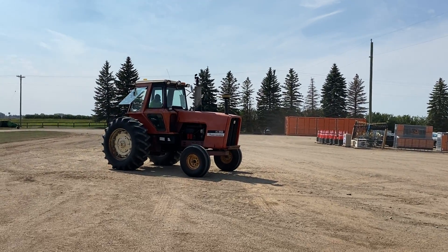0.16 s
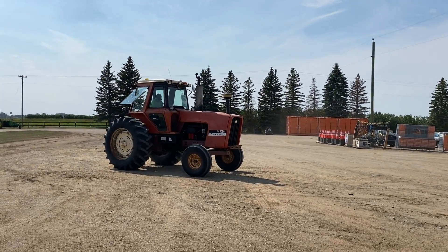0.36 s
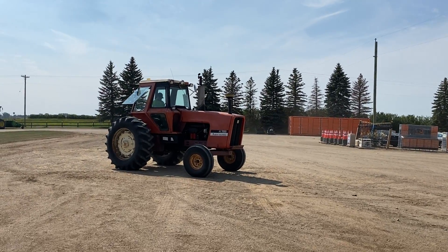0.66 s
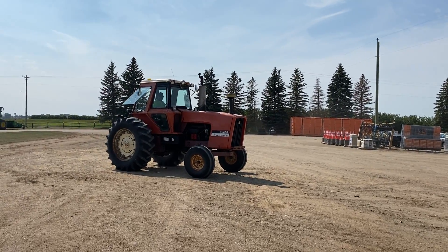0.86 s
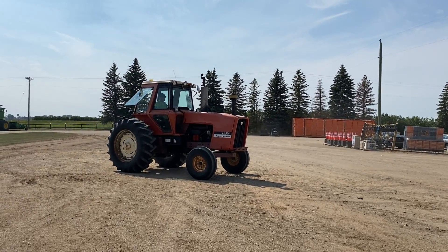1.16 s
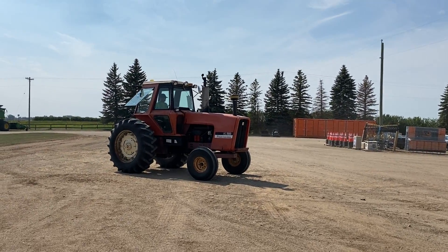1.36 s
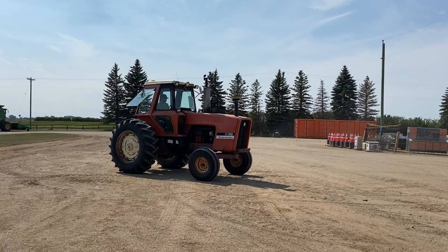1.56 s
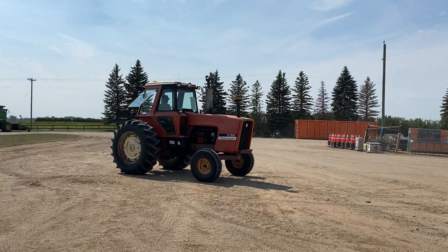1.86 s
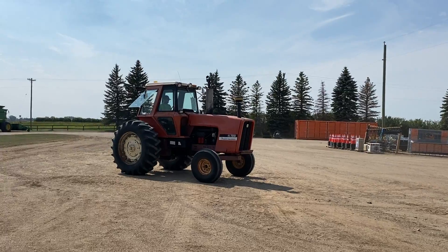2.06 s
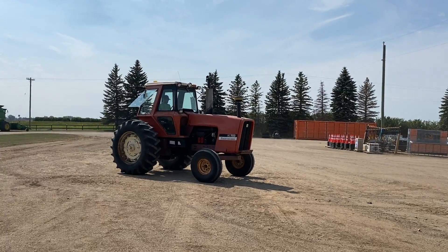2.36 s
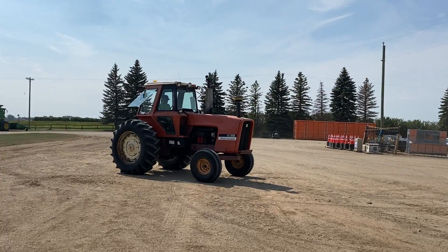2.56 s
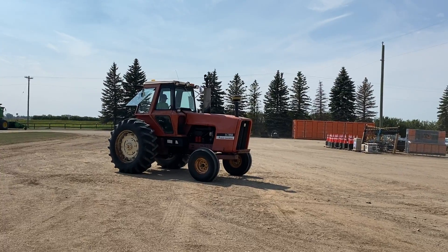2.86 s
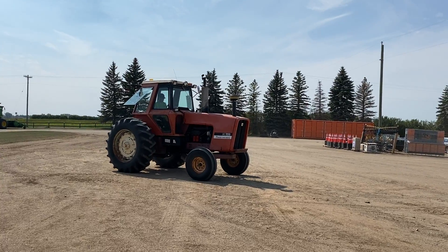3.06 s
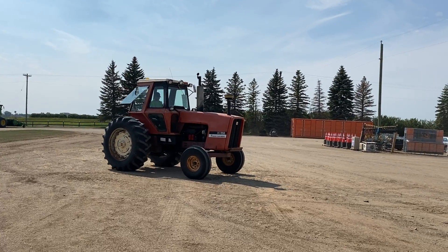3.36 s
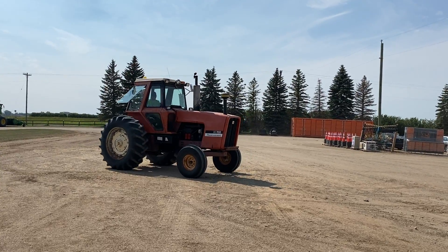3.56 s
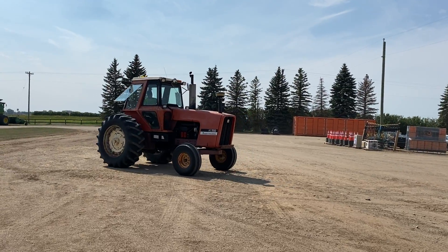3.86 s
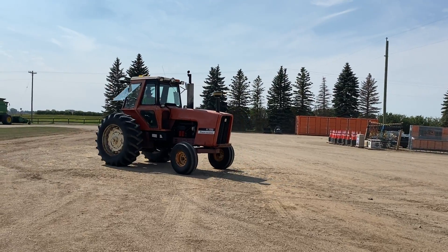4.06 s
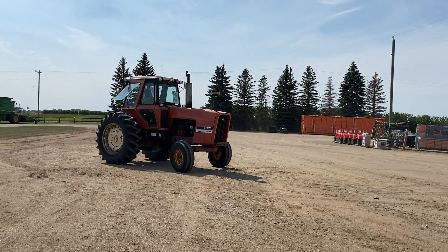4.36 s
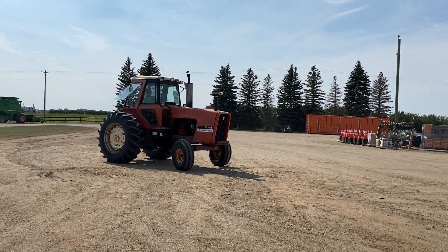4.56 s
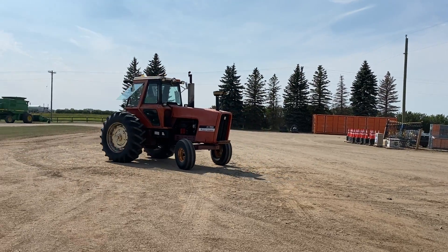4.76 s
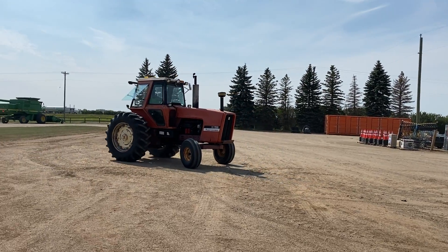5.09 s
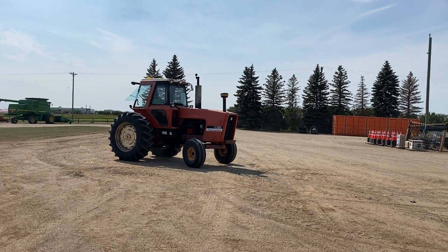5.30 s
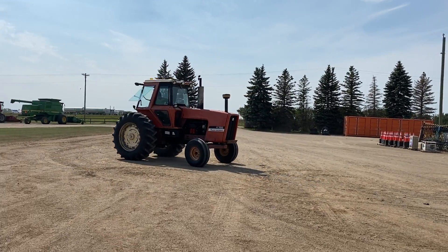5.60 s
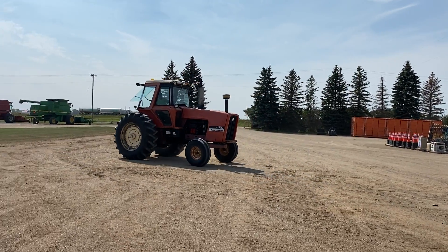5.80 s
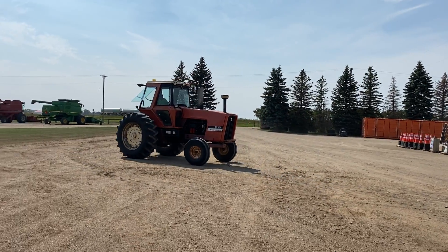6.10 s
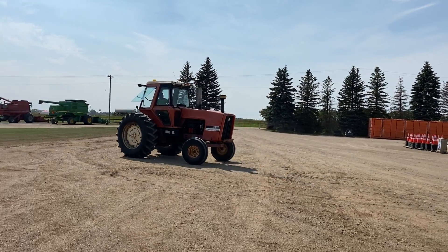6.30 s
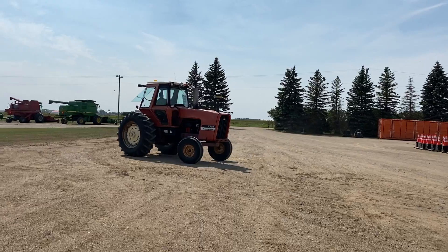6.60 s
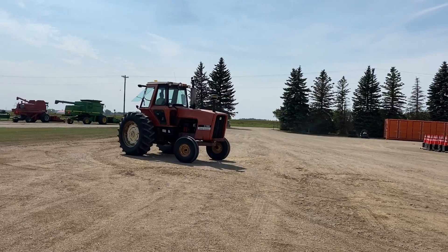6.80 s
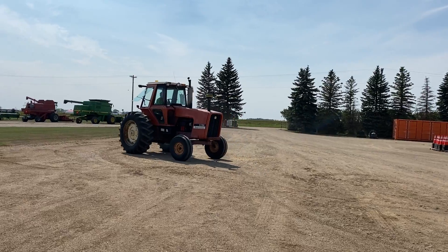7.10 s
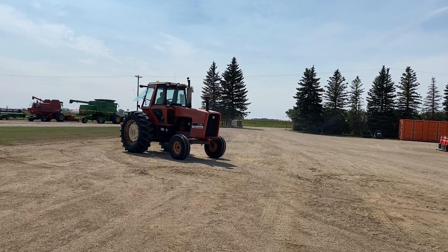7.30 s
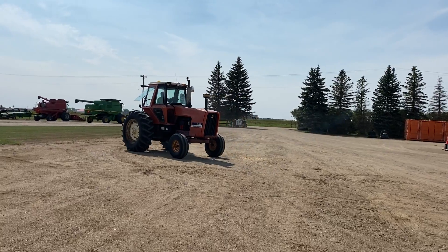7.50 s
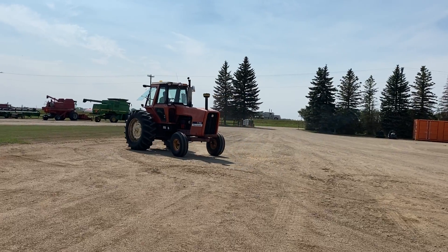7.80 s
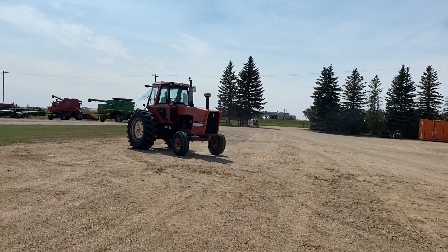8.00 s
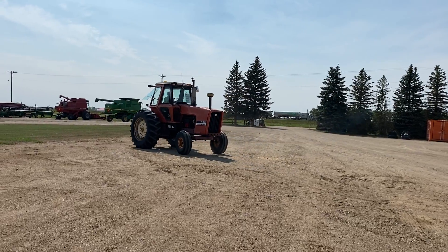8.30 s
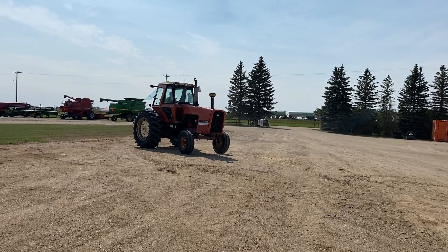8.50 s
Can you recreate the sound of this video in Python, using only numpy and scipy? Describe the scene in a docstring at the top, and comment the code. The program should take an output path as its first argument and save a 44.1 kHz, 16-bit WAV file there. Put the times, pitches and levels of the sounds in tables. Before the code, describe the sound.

Outdoors in an open gravel yard, a large diesel tractor runs steadily at medium-fast speed, with dense knocking, metallic clatter, airy turbo hiss and a strong low drone. Engine speed sags slightly near three seconds. Wind rumbles and thuds on a hand-held stereo microphone, peaking just before four seconds; then the low notes suddenly vanish, leaving a thinner, rattling engine with short wind flutters and a few late slaps.

```python
"""A six-cylinder diesel tractor crawls across a gravel yard, near a hand-held phone in gusty wind.
The block repeats its pattern of knocks every two turns: slowly changing noise, struck by each firing.
Firing and fan notes hum below as sine orders of the shaft; turbocharger hiss, a moving noise band, lies above.
Wind buffets two microphone ports as noise gusts and swinging thuds, until a low cut slides up
and takes the low notes away."""
import sys
import numpy as np
from scipy import signal
from scipy.fft import rfft, irfft, next_fast_len
from scipy.io import wavfile
from scipy.ndimage import uniform_filter1d, minimum_filter1d, map_coordinates

SR = 44100
rng = np.random.default_rng(int(sys.argv[2]) if len(sys.argv) > 2 else 0)


def output_pcm(signal):
    """Save a mono or channel-first signal as 16-bit PCM at the path in sys.argv[1].

    Samples are clipped to [-1, 1] before scaling.
    """
    pcm = np.clip(np.atleast_2d(signal).T, -1, 1) * 32767
    wavfile.write(sys.argv[1], SR, np.round(pcm).astype(np.int16))


N = 381465


# Crankshaft speed. Each row: time in seconds, speed in rpm.
SHAFT_SPEED = [(0, 1554), (1.9, 1551), (2.3, 1546), (2.6, 1512), (3.05, 1462), (3.3, 1460), (3.6, 1468),
               (4.3, 1466), (4.6, 1467), (5.15, 1481), (5.8, 1480), (6.2, 1488), (6.7, 1488), (7.05, 1484),
               (7.35, 1536), (7.8, 1539), (8.65, 1535)]


def crankshaft():
    """Phase is the integral of speed: counts the four-stroke cycles, of two turns each."""
    rpm = curves(SHAFT_SPEED)[0]
    return np.cumsum(rpm) / (120 * SR)


def tractor(cycle):
    """Superposition of block knock, top-end clatter, turbocharger hiss and a ringing panel."""
    return block_knock(cycle) + top_end_clatter(cycle) + turbocharger(cycle) + ringing_panel(cycle)


# Engine noise. Each row: time in seconds, block knock in dB, mean top-end clatter in dB.
ENGINE_LEVELS = [(0, -22.5, -36), (.7, -22.5, -33.5), (1.8, -23, -34), (2.4, -21.5, -33),
                 (3.9, -21.5, -33.5), (5.4, -24, -34.5), (6.6, -23.5, -36.5), (7.2, -22, -36),
                 (7.6, -21.5, -38), (8.65, -24, -38)]
# How the tractor faces the phone. Each row: time in seconds, facing from 0 side-on to 1 nose-on,
# changes of the knock pattern per second, unrepeated noise in dB relative to the repeating noise.
FACING_PATH = [(0, 0, .9, -9.5), (2.1, 0, .9, -9.5), (2.5, .3, 2.2, -6), (3.2, 1, 2.2, -6),
               (3.8, 1, 1.1, -9), (5.8, 1, 1.1, -9), (6.6, .7, 1.1, -9), (7, .6, 2.2, -6),
               (8.65, .5, 2.2, -5)]
# Relative spectrum of the block. Each row: frequency in Hz, density in dB per Hz.
BLOCK_SPECTRUM = [(60, 7), (150, -8.5), (400, -7.5), (650, -1), (850, 2), (1050, 0), (1250, 3),
                  (1500, -2.5), (1750, -1.5), (2100, -7), (2400, -9), (2900, -20), (3600, -45)]


def block_knock(cycle):
    """Forced vibration: a cyclic noise pattern, partly random, pulsed by combustion and coloured by the block."""
    knock_db, _ = curves(ENGINE_LEVELS)
    _, change, loose_db = curves(FACING_PATH)
    drive = repeating(cycle, change) + amp(loose_db) * rng.standard_normal(N)
    drive /= np.sqrt(1 + amp(2 * loose_db))  # the mix keeps its power
    blows = drive * firings(cycle, fall_db=5, scatter_db=.8)
    return amp(knock_db) * coloured(blows + cracks(cycle), BLOCK_SPECTRUM)


def repeating(cycle, change):
    """Periodicity gives a line spectrum: all orders alike in strength, melting into new patterns."""
    size = 3400  # samples in one pattern
    age = np.cumsum(change) / SR
    phases = rng.random((int(age[-1]) + 2, size // 2 + 1))
    patterns = unit(irfft(np.exp(2j * np.pi * phases), size))
    row = age.astype(int)
    place = (cycle % 1 * size).astype(int)
    turn = np.pi / 2 * (age - row)  # equal-power crossfade
    return np.cos(turn) * patterns[row, place] + np.sin(turn) * patterns[row + 1, place]


# Uneven cylinders. Each entry: relative strength of one firing in dB.
CYLINDER_STRENGTHS = [0.89, 1.3, 1.3, 0.89, 0.74, 1.23]


def firings(cycle, fall_db, scatter_db):
    """Impulsive excitation: six uneven blows a cycle rise at once and fall exponentially, by fall_db each."""
    place = cycle * len(CYLINDER_STRENGTHS)
    blow = place.astype(int)
    chance = scatter_db * rng.standard_normal(blow[-1] + 1)[blow]
    strength = np.take(CYLINDER_STRENGTHS, blow, mode="wrap")
    return amp(strength + chance - fall_db * (place % 1))


def cracks(cycle):
    """Steep pressure rise: one sharp click of uneven size at each combustion, to be coloured by the block."""
    start = np.diff(np.floor(cycle * len(CYLINDER_STRENGTHS)), prepend=0)
    return -start * amp(15 + 3 * rng.standard_normal(N))  # 15 dB, scatter 3 dB


# Relative spectrum of the top end. Each row: frequency in Hz, density in dB per Hz.
TOP_END_SPECTRUM = [(1500, -1.5), (2500, 9.5), (3500, 3.5), (5200, 4), (6200, -0.5), (7200, -7.5),
                    (9000, -6), (11000, -12.5), (15500, -17)]
RATTLE_DB, RATTLES_PER_S = .6, 8  # the level wanders as the wheels roll over ruts


def top_end_clatter(cycle):
    """Amplitude modulation: patchy noise beats with the firings, between the block's blows."""
    _, clatter_db = curves(ENGINE_LEVELS)
    rattle = patchy(rng.standard_normal(N), depth_db=1)  # loose tinware shakes over the gravel
    blows = rattle * firings(cycle + .25, fall_db=3.8, scatter_db=1.3)
    return amp(clatter_db + RATTLE_DB * wobble(RATTLES_PER_S)) * coloured(blows, TOP_END_SPECTRUM)


# Turbo hiss. Each row: time in seconds, centre in Hz, level in dB.
HISS = [(0, 4390, -48), (.65, 4320, -47), (.72, 4330, -40), (1.3, 4300, -48), (1.37, 4310, -40),
        (1.95, 4280, -47), (2, 4270, -38), (2.07, 4280, -45.5), (2.65, 4380, -38.5), (2.77, 4420, -41.5),
        (4.14, 4600, -41.5), (4.18, 4600, -63), (4.26, 4650, -45), (4.45, 4700, -41), (4.99, 4500, -39.5),
        (5.28, 4480, -32.5), (5.35, 4510, -46), (5.59, 4520, -35), (6.38, 4460, -42), (6.48, 4560, -45),
        (6.53, 4500, -34), (6.67, 4530, -44), (7.47, 4400, -43.5), (7.61, 4350, -50), (7.78, 4420, -42.5),
        (8.65, 4400, -46.5)]
# Narrow core of the hiss. Each row: time in seconds, centre in Hz, level in dB.
HISS_CORE = [(0, 4220, -56), (.65, 4220, -55), (.75, 4220, -44), (2.1, 4215, -44.5), (2.5, 4220, -52),
             (2.9, 4240, -77), (8.65, 4240, -77)]
TICK_DB = 6.5  # nose-on, the fall after each firing that chops the hiss into ticks


def turbocharger(cycle):
    """Heterodyning: low noise is shifted to moving centres; the wide band also surges with the firings."""
    facing = curves(FACING_PATH)[0]
    hiss_hz, hiss_db = curves(HISS)
    core_hz, core_db = curves(HISS_CORE)
    band = coloured(rng.standard_normal(N), [(1, 0), (200, -1), (320, -6), (460, -22), (1200, -60)])
    core = coloured(rng.standard_normal(N), [(1, 0), (60, 0), (110, -6), (180, -22), (400, -60)])
    surge = firings(cycle / 3, fall_db=3, scatter_db=.8)  # two surges a cycle
    ticks = firings(cycle + .25, fall_db=TICK_DB * facing, scatter_db=1.5)
    hiss = amp(hiss_db) * centred(band * unit(surge * ticks), hiss_hz)
    return hiss + amp(core_db) * centred(core, core_hz)


# Relative spectrum of the panel. Each row: frequency in Hz, density in dB per Hz.
PANEL_SPECTRUM = [(1900, -60), (2200, -10), (2330, 0), (2520, 0), (2650, -10), (3000, -60)]
PANEL_SIDE_DB, PANEL_NOSE_DB = -49, -46  # level side-on and nose-on


def ringing_panel(cycle):
    """Resonance: noise bursts at each firing are narrowed to the band where a panel rings."""
    facing = curves(FACING_PATH)[0]
    bursts = rng.standard_normal(N) * firings(cycle, fall_db=14, scatter_db=3)
    level_db = PANEL_SIDE_DB + (PANEL_NOSE_DB - PANEL_SIDE_DB) * facing
    return amp(level_db) * coloured(bursts, PANEL_SPECTRUM)


# The two low notes, which drop away as the wind peaks.
# Each row: time in seconds, mean firing note in dB, mean fan blade note in dB.
LOW_NOTE_LEVELS = [(0, -46, -16), (.5, -49, -18.5), (1.2, -32, -17), (1.6, -21.5, -19.5),
                   (2.2, -23.5, -21.5), (2.9, -20, -18), (3.2, -25, -27), (3.85, -27, -30),
                   (3.93, -75, -75)]
# The order that comes and goes. Each row: time in seconds, mean level in dB.
WHINE_LEVELS = [(0, -42), (3, -38), (3.5, -37), (4.7, -36), (4.85, -31), (5.6, -31), (6.2, -35), (6.6, -38),
                (8.65, -49)]
# Orders that stand out. Each row: order of the two-turn cycle, level in dB side-on, level in dB nose-on,
# both before the pattern changes and firings shape them.
ORDER_LEVELS = [(13, -32, -40), (16, -31, -42), (24, -35, -50), (26, -28, -47), (44, -35, -50),
                (45, -36, -50), (48, -39, -39), (62, -33, -46), (63, -41, -36), (69, -31, -40),
                (70, -48, -36), (74, -32, -44), (81, -48, -36), (86, -40, -33), (93, -30, -44),
                (96, -48, -37), (98, -31, -35), (99, -48, -37), (104, -39, -33), (106, -44, -37),
                (123, -36, -39), (132, -46, -37)]
FAN_ORDER, WHINE_ORDER = 11.82, 72  # periods per two-turn cycle


def tones(cycle):
    """Order tracking: sines locked to the shaft, whose levels change as the tractor turns; fan between orders."""
    facing, change, _ = curves(FACING_PATH)
    firing_db, fan_db = curves(LOW_NOTE_LEVELS)
    out = amp(firing_db + wobble(4.93)) * np.sin(2 * np.pi * len(CYLINDER_STRENGTHS) * cycle)
    out += amp(fan_db + 0.45 * wobble(4.98)) * np.sin(2 * np.pi * FAN_ORDER * cycle)
    whine = amp(curves(WHINE_LEVELS)[0] + 1.5 * wobble(6))
    beat = 1 + .3 * np.cos(2 * np.pi * cycle)
    out += whine * beat * np.sin(2 * np.pi * WHINE_ORDER * cycle + .5 * wobble(4))
    pulse = firings(cycle, fall_db=4, scatter_db=1.5) * amp(-.5)  # each firing feeds the orders anew
    for order, side_db, nose_db in ORDER_LEVELS:
        level_db = side_db + (nose_db - side_db) * facing - 2 * change + 2.2 * wobble(5)
        phase = 2 * np.pi * (order * cycle + rng.random()) + .45 * wobble(4)
        out += amp(level_db) * pulse * np.sin(phase)
    return out


# Breeze on the ports, swelling to one hard gust.
# Each row: time in seconds, mean low rumble in dB, mean flutter in dB, left minus right in dB.
BREEZE = [(0, -31, -27, 2), (.4, -28, -26, -1), (.6, -25, -28, 0), (1.17, -26.5, -27.5, 1),
          (1.3, -24.5, -28, 0), (2.7, -27.5, -30, 0), (3.2, -24.5, -27.5, -1), (3.4, -19, -30, 1.5),
          (3.55, -21, -28, 1.5), (3.7, -13.5, -24, 2), (3.76, -21, -18, 2), (3.86, -17, -14.5, -0.5),
          (3.9, -30, -21, 3), (3.94, -40, -22.5, 0), (3.99, -60, -26, -1), (4.05, -58, -29, 2.5),
          (5.1, -54, -35, 0.5), (6.1, -58, -28.5, 1), (6.9, -65, -32, 2), (7.2, -62, -25, 2),
          (7.56, -64, -36, 3), (7.68, -60, -33, 7), (7.85, -60, -64, 14), (8.65, -60, -54, 13)]
# Relative spectrum of the rumble. Each row: frequency in Hz, density in dB per Hz.
RUMBLE_SPECTRUM = [(20, -24), (40, -9), (65, 5.5), (120, 6), (230, 0.5), (330, 0.5), (500, -70)]
# Relative spectrum of the flutter. Each row: frequency in Hz, density in dB per Hz.
FLUTTER_SPECTRUM = [(80, 5), (200, 0), (450, 6), (650, -3), (1200, -14), (2500, -99)]
# Puffs of flutter. Each row: centre in seconds, peak in dB, half-width in seconds.
FLUTTER_PUFFS = [(3.98, -32, 0.018), (4.55, -34, .01), (4.721, -27, 0.0087), (4.79, -28, .018),
                 (4.971, -22.5, 0.0055), (5.12, -29, 0.022), (5.22, -22, .014), (5.28, -20.5, 0.03),
                 (5.375, -26.5, 0.045), (5.47, -22.5, 0.019), (5.62, -22, .015), (5.645, -20.5, 0.019),
                 (5.72, -17, 0.0053), (5.86, -29, 0.029), (5.93, -25, 0.017), (6.031, -28, .018),
                 (6.15, -22, 0.027), (6.235, -25.5, 0.0064), (7.09, -37, 0.014), (7.175, -37, .008),
                 (7.205, -27, 0.0096), (7.29, -21, 0.014), (7.36, -23.5, 0.04), (7.46, -19, 0.0089),
                 (7.54, -18, 0.052), (7.63, -23, 0.0087)]
# Deep shoves of air. Each row: centre in seconds, peak in dB before a random wobble, pitch in Hz.
AIR_THUDS = [(.44, -34, 80), (.57, -26, 80), (1, -27, 80), (1.07, -20, 80.5), (2.809, -19, 80),
             (3.245, -16, 120), (3.364, -8, 69.5), (3.409, -10.5, 129), (3.539, -10, 121), (3.615, -9, 235),
             (3.681, -16, 110), (3.749, -12, 282), (3.803, -9.5, 80), (3.853, -8.5, 141), (3.861, -9, 260)]
# Eddies slapping the ports. Each row: centre in seconds, peak in dB.
EDDY_SLAPS = [(3.875, -17), (5.271, -16), (5.292, -18), (7.569, -10), (7.7, -15), (7.725, -15),
              (7.759, -16), (7.804, -20), (8.428, -14), (8.437, -17)]
# Relative spectrum of the slaps. Each row: frequency in Hz, density in dB per Hz.
SLAP_SPECTRUM = [(80, -3), (300, -11.5), (700, 4.5), (1400, -5), (2500, -22), (5000, -68)]
RUMBLE_GUSTY_DB, FLUTTER_GUSTY_DB, GUSTS_PER_S = 2, 1.5, 9  # random swells of the breeze
THUD_SWINGS, SLAP_S = 1.2, 0.0029  # half-widths: in swings of the thud's pitch, in seconds


def wind():
    """Turbulent pressure: rumble and flutter follow the breeze; thuds, puffs and slaps stand out of it."""
    rumble_db, flutter_db, side_db = curves(BREEZE)
    low = amp(rumble_db + RUMBLE_GUSTY_DB * wobble(GUSTS_PER_S))
    high = amp(flutter_db + FLUTTER_GUSTY_DB * wobble(2 * GUSTS_PER_S))
    high += bumps(*np.transpose(FLUTTER_PUFFS))
    rumble = low * gusts(RUMBLE_SPECTRUM, alike=.74, lumpy_db=1.2, rate=16)
    flutter = high * gusts(FLUTTER_SPECTRUM, alike=.75, lumpy_db=1.2, rate=35)
    s, db, hz = np.transpose(AIR_THUDS)
    shoves = -bumps(s, db, THUD_SWINGS / hz, hz)
    thuds = shoves * amp(2 * np.array([wobble(30), wobble(30)]))  # each port wobbles on its own
    slaps = bumps(*np.transpose(EDDY_SLAPS), SLAP_S) * gusts(SLAP_SPECTRUM, alike=.7, lumpy_db=1, rate=35)
    return amp(np.outer([.5, -.5], side_db)) * (rumble + thuds + flutter + slaps)


def gusts(spectrum, alike, lumpy_db, rate):
    """Partial coherence: lumpy turbulence, partly shared by both ports."""
    turn = np.arccos(np.clip(alike, 0, 1)) / 2
    lumps = amp(lumpy_db * np.array([wobble(rate), wobble(rate)]))
    shared, differing = rng.standard_normal((2, N)) * lumps
    left = np.cos(turn) * shared + np.sin(turn) * differing
    right = np.cos(turn) * shared - np.sin(turn) * differing
    return coloured(np.array([left, right]), spectrum)


def bumps(times, peaks_db, widths_s, pitches_hz=0):
    """Gaussian wave packets: a bell-shaped swell for each event, swinging at its pitch."""
    out = np.zeros(N)
    for s, db, width_s, hz in np.broadcast(times, peaks_db, widths_s, pitches_hz):
        at = np.arange(int((s - 3 * width_s) * SR), int((s + 3 * width_s) * SR))
        t = at / SR - s
        out[at] += amp(db) * np.exp(-(t / width_s) ** 2) * np.cos(2 * np.pi * hz * t)
    return out


# Phase between the ports. Each row: frequency in Hz, lead of the left in radians.
PORT_LEAD = [(0, 0), (1400, .1), (3000, 1.6), (4100, 1.1), (5200, 2.7), (8300, -3.14), (15500, -15.7)]
# Likeness of the ports. Each row: frequency in Hz, likeness from 0 to 1.
PORT_LIKENESS = [(100, .78), (1000, .9), (3000, .87), (5000, .75), (7500, .7), (8200, .86), (15000, .86)]
# Level between the ports. Each row: frequency in Hz, left minus right in dB.
PORT_TILT = [(150, -1), (250, -2.5), (1200, 1.5), (1600, -4), (2000, -0.5), (2800, -1), (4000, 2.5),
             (5500, 3), (7500, 3.5), (8400, -1)]


def ports(near, scattered):
    """Interaural-style cues: phase lead and level tilt between two ports, plus a share that differs."""
    side = np.array([[1], [-1]])

    def place(hz):
        lead = np.interp(hz, *np.transpose(PORT_LEAD)) / 2
        return np.exp(1j * side * lead) * amp(side * along(PORT_TILT, hz) / 2)

    def share(hz):
        return np.arccos(np.clip(along(PORT_LIKENESS, hz), 0, 1)) / 2

    direct = filtered(near, lambda hz: place(hz) * np.cos(share(hz)))
    return direct + filtered(scattered, lambda hz: side * place(hz) * np.sin(share(hz)))


def amp(db):
    """Logarithmic level: decibels to gain."""
    return np.exp(np.asarray(db) * (np.log(10) / 20))


def unit(x):
    """Power normalisation: scaled to rms 1."""
    return x / np.sqrt(np.mean(x ** 2) + 1e-20)


def along(points, hz):
    """Logarithmic frequency scale: (Hz, value) points joined on it."""
    f, v = np.transpose(points)
    return np.interp(np.log(hz + 1), np.log(f + 1), v)


def curves(rows):
    """Linear interpolation: one value per sample for each column after the time."""
    s, *cols = np.transpose(rows)
    return [np.interp(np.arange(N) / SR, s, c) for c in cols]


def wobble(rate):
    """Slow random modulation: a smooth curve through rate random knots a second."""
    place = np.arange(0, N + 64, 64)
    knots = rng.standard_normal(int(N * rate / SR) + 4)
    smooth = map_coordinates(knots, [place * rate / SR])
    return np.interp(np.arange(N), place, smooth)


def filtered(x, response):
    """Linear filtering: the spectrum times a response of frequency."""
    m = next_fast_len(N + 8192)
    return irfft(rfft(x, m) * response(np.fft.rfftfreq(m, 1 / SR)), m)[..., :N]


def coloured(x, spectrum):
    """Spectral shaping: x through (Hz, dB) points, at rms 1."""
    return unit(filtered(x, lambda hz: amp(along(spectrum, hz))))


def centred(x, hz):
    """Ring modulation: a low band moved to both sides of a centre frequency, at equal power."""
    return x * 2 ** .5 * np.sin(2 * np.pi * np.cumsum(hz) / SR)


def patchy(x, depth_db):
    """Time-frequency modulation: random patches of gain, about 1.5 kHz by 35 ms."""
    z = signal.stft(x, nperseg=256)[2]
    field = uniform_filter1d(rng.standard_normal(z.shape), size=9, axis=0)
    field = uniform_filter1d(field, size=12, axis=1)
    return signal.istft(z * amp(depth_db * unit(field)), nperseg=256)[1][:N]


def limited(x):
    """Peak limiting: one gain for both ports dips smoothly, 10 ms around each peak over 0.9."""
    need = np.minimum(1, .9 / (np.abs(x).max(axis=0) + 1e-9))
    return x * uniform_filter1d(minimum_filter1d(need, size=881), size=441)


def scene():
    """Superposition of the tractor heard directly, the tractor scattered by the yard, and the wind."""
    cycle = crankshaft()
    hum = tones(cycle)
    near = tractor(cycle) + hum
    scattered = tractor(cycle) - 0.47 * hum
    return ports(near, scattered) + wind()


# Sliding low cut. Each row: time in seconds, edge in Hz.
LOW_CUT_EDGE = [(0, 82), (1.2, 58.3), (3.2, 37), (3.86, 38.8), (3.94, 150), (4.02, 176), (4.5, 158),
                (4.76, 167), (4.88, 253), (5.2, 185), (5.4, 262), (5.58, 250), (5.635, 156), (5.69, 250),
                (5.78, 268), (5.97, 230), (6.05, 176), (6.9, 158), (7.06, 235), (7.3, 189), (7.4, 290),
                (7.7, 209), (7.8, 330), (7.86, 483), (7.94, 504), (7.97, 660), (8.17, 650), (8.26, 540),
                (8.42, 478), (8.65, 555)]
# Two shelves. Each row: time in seconds, bass edge in Hz, gain in dB below it, gain in dB below 1.8 kHz.
SHELVES = [(0, 700, -1, -2), (3.9, 700, -0.5, 1), (4.05, 626, -3.5, 1), (5, 650, -3.5, 1),
           (5.5, 820, -6, 1.5), (7, 756, -4, 0), (7.8, 700, 2, -4), (7.86, 696, -3, -11.5),
           (8.65, 690, -3, -7)]
SKIRT_DB, SKIRT_DB_PER_HZ = -6, 0.22  # what leaks below the low cut's edge
SKIRT_ENDS_HZ = 360  # the leak fades out as the edge rises past this
TOP_HZ = 15770  # band limit


def record(dry):
    """Time-varying filtering: a steep low cut and two sliding shelves, then a limiter and the band limit."""
    hz, t, z = signal.stft(dry, SR, nperseg=2048, noverlap=1536)
    hz = hz[:, None] + 1
    edge_hz = np.interp(t, *np.transpose(LOW_CUT_EDGE))
    low_cut = 1 / np.sqrt(1 + (edge_hz / hz) ** 34) + amp(-50)
    skirt = amp(SKIRT_DB - SKIRT_DB_PER_HZ * (edge_hz - hz).clip(0)) * (hz / edge_hz).clip(0, 1) ** 2
    low_cut = np.maximum(low_cut, skirt / (1 + (edge_hz / SKIRT_ENDS_HZ) ** 10))
    s, bass_hz, bass_db, middle_db = np.transpose(SHELVES)
    bass = np.interp(t, s, bass_db) / (1 + (hz / np.interp(t, s, bass_hz)) ** 16)
    middle = np.interp(t, s, middle_db) / (1 + (hz / 1800) ** 4)
    shaped = z * low_cut * amp(bass + middle)
    cut = signal.istft(shaped, SR, nperseg=2048, noverlap=1536)[1][:, :N]
    return filtered(limited(cut), lambda hz: hz < TOP_HZ)


dry = scene()
out = record(dry)
output_pcm(out)
```